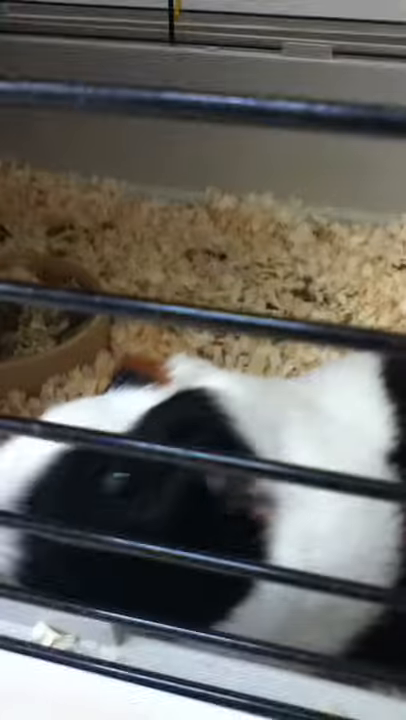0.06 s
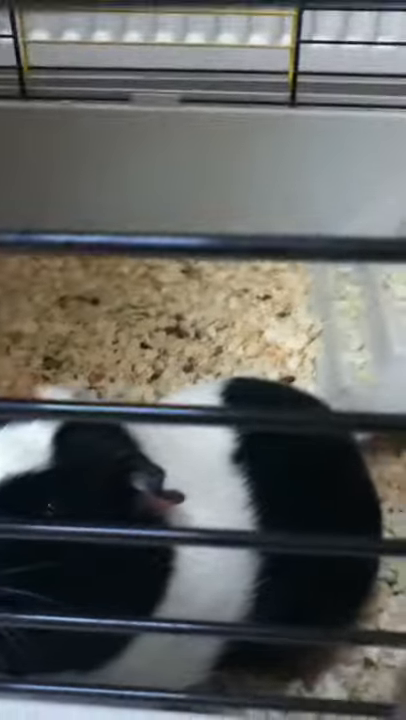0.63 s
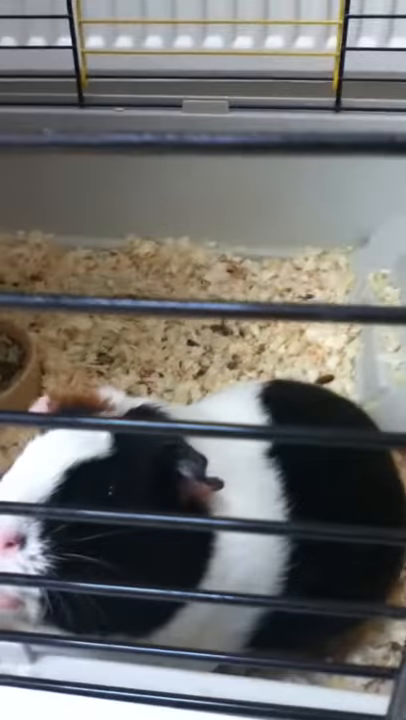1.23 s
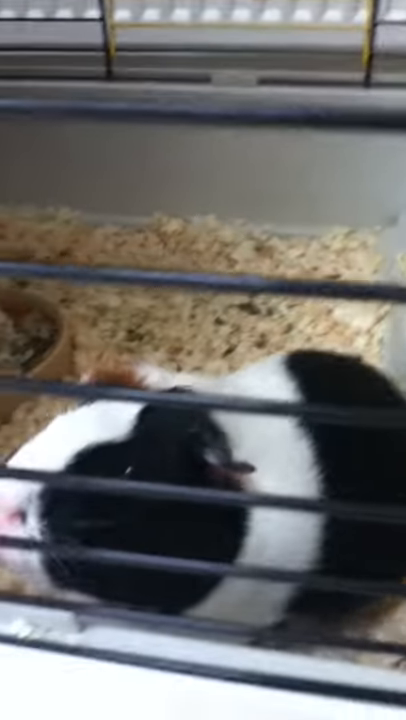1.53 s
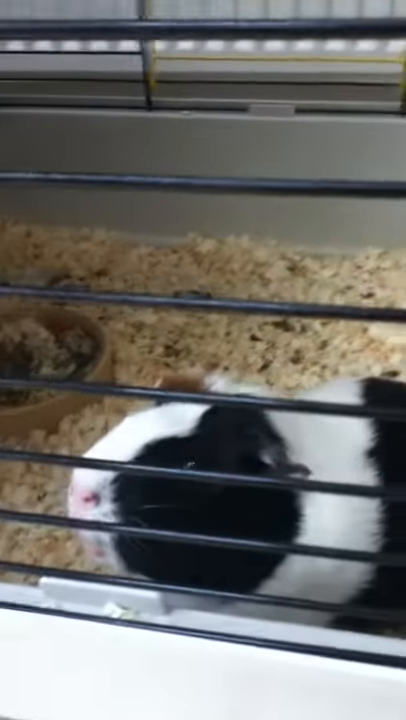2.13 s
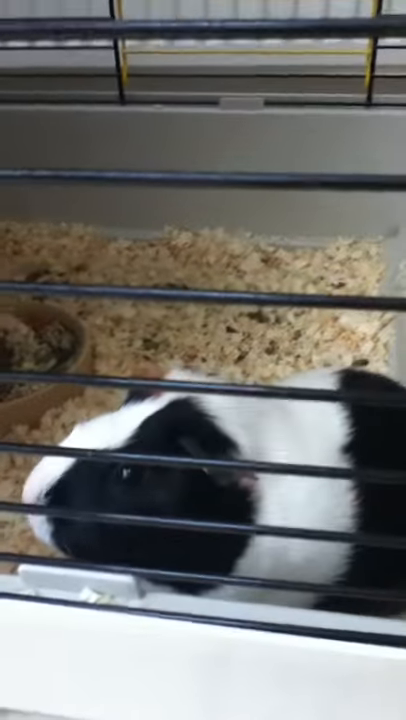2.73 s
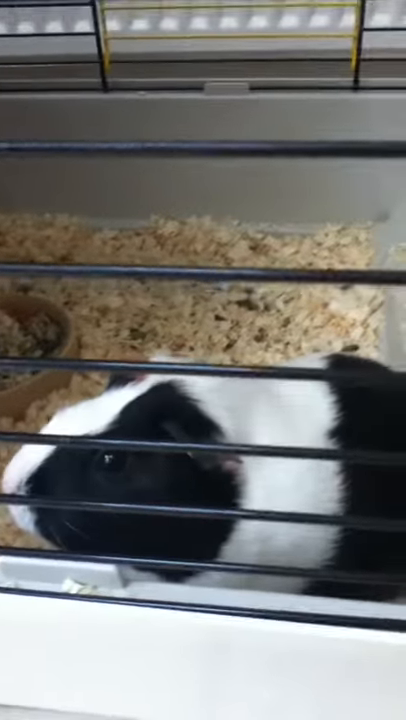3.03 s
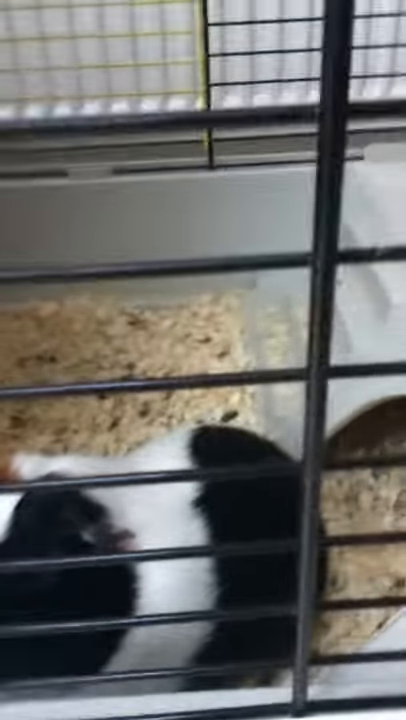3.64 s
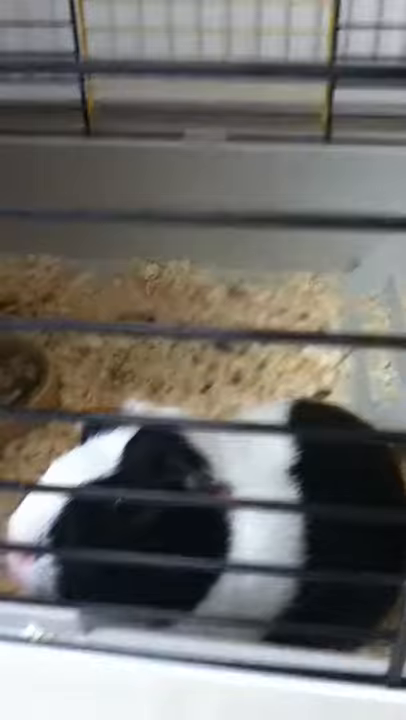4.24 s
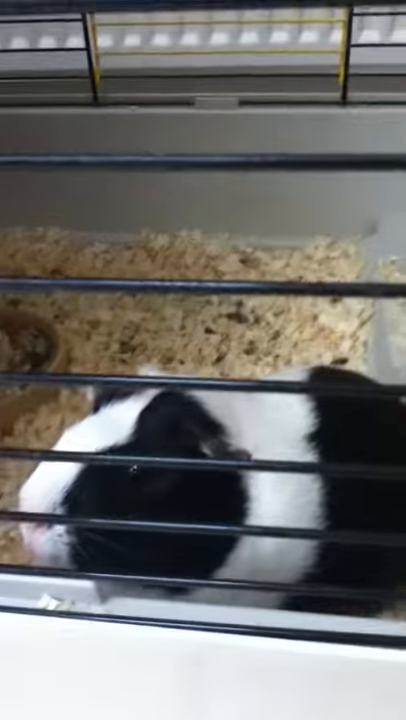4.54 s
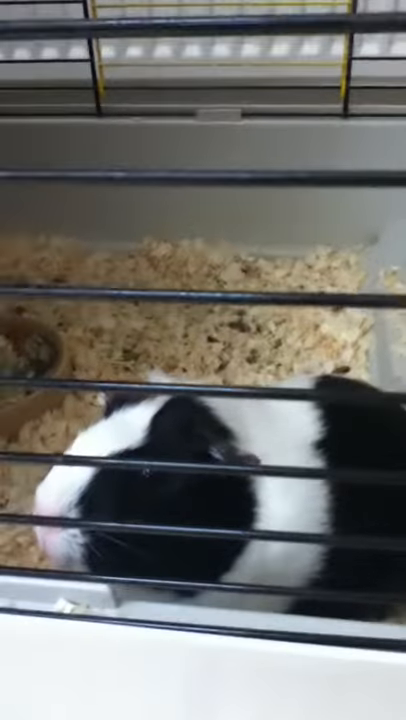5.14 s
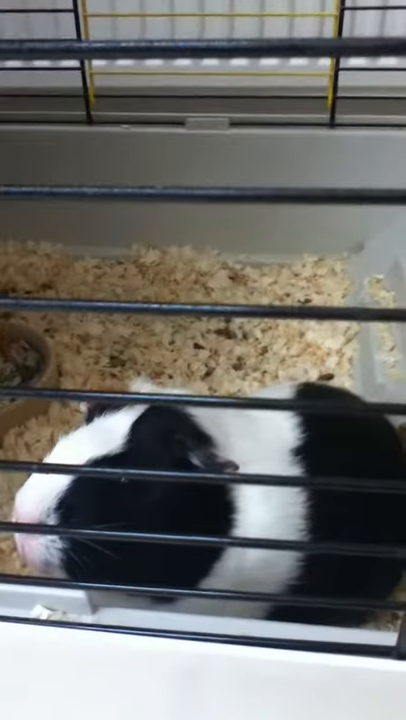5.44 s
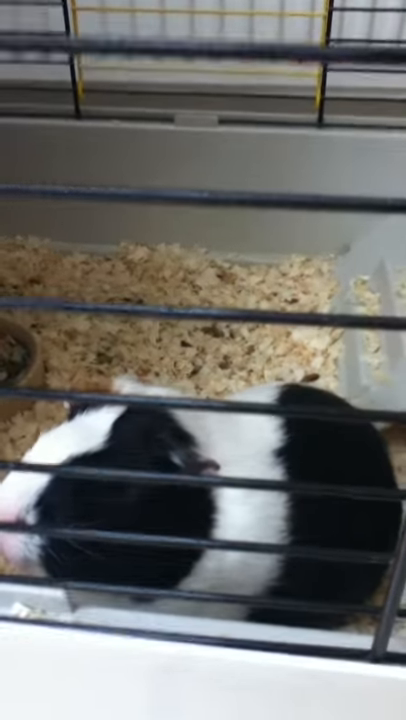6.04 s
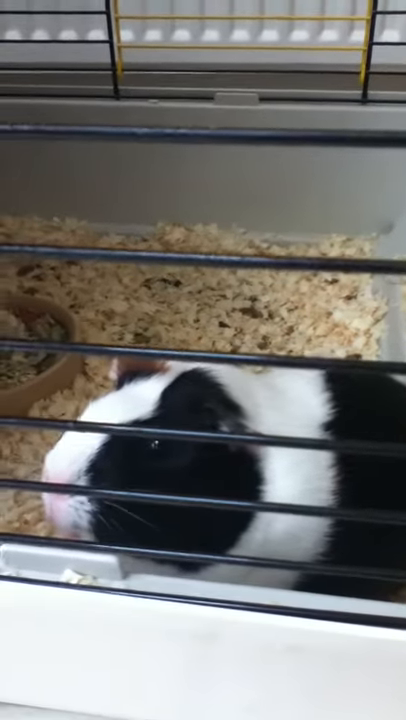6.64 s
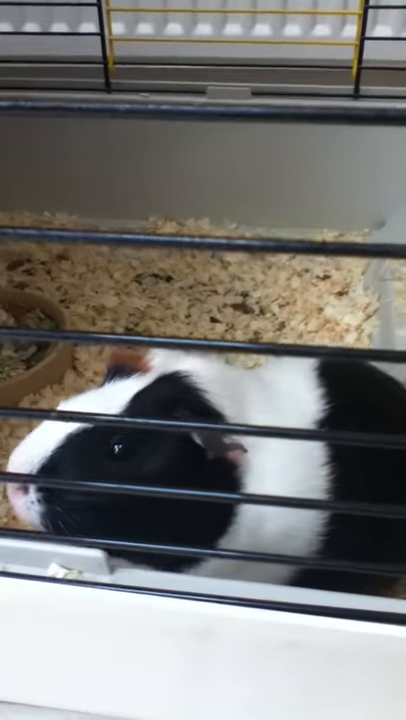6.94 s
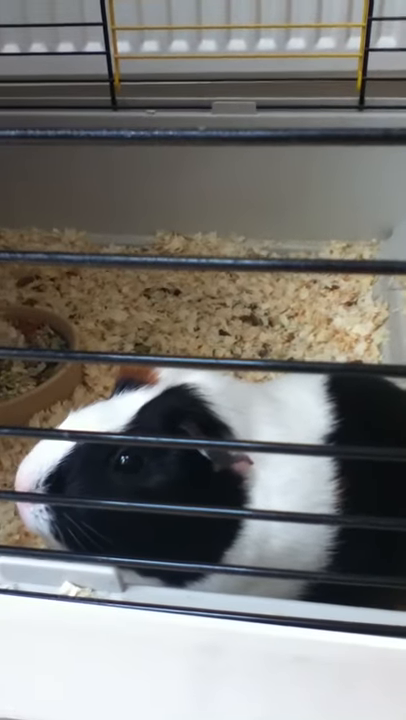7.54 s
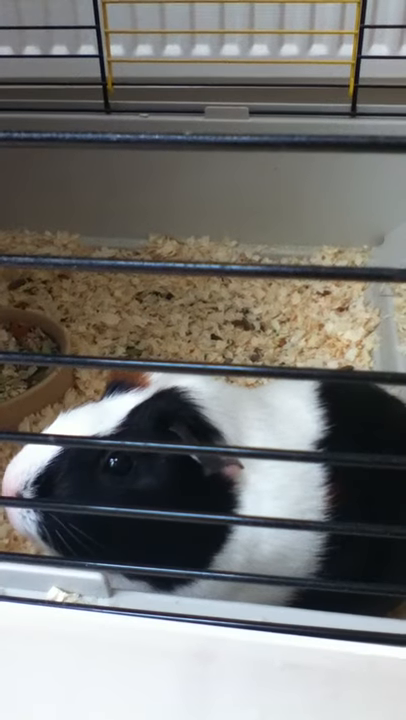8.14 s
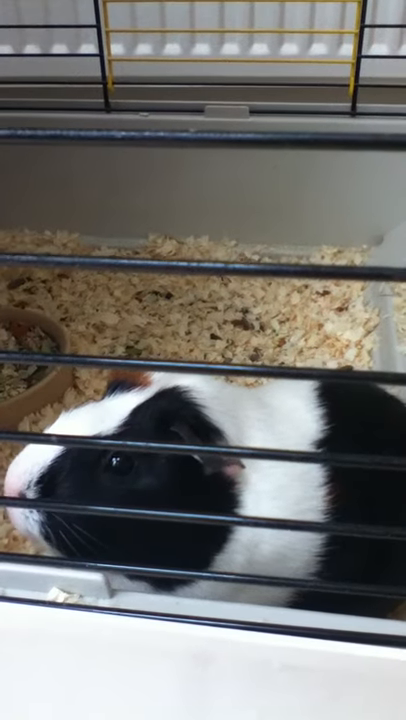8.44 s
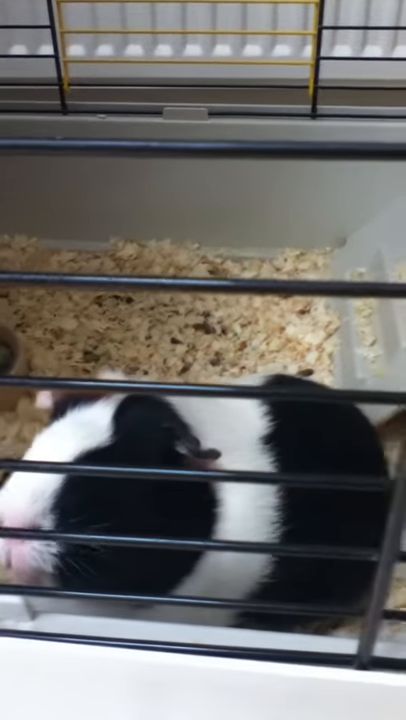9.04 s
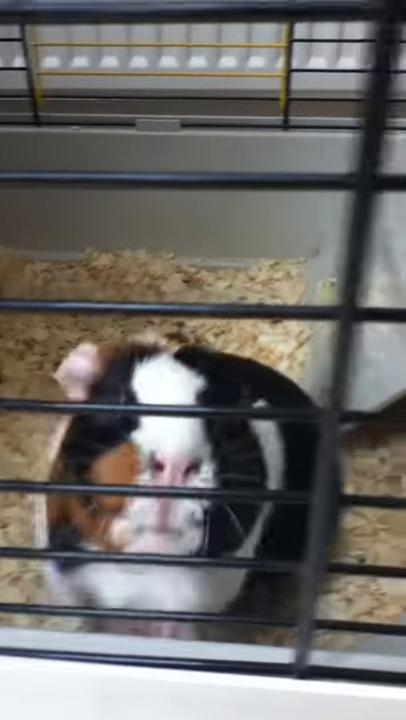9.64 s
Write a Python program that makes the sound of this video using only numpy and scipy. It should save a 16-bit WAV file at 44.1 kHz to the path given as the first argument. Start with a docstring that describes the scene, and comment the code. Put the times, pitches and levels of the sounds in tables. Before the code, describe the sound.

Close, rising guinea pig chirps mix with loud, shrill squeals while feet rustle softly in a wire cage indoors.

```python
"""Guinea pigs beg in a wire cage, close to the microphone in a small room; faint mains hum and whine.
From the start their chirps overlap, each a low hum of the vocal folds that sweeps upward, and three
calls climb to thin squeals. Claws and bars tick; a second in, feet begin to scuffle in wood shavings
on the plastic tray. Chirps fill the middle, with one squeal; from six to nine seconds five more come.
A flurry of scuffles and ticks ends the scene."""
import sys
import numpy as np
from scipy import signal
from scipy.fft import rfft, irfft, next_fast_len
from scipy.io import wavfile
from scipy.ndimage import uniform_filter1d, minimum_filter1d, map_coordinates

SR = 44100
rng = np.random.default_rng(int(sys.argv[2]) if len(sys.argv) > 2 else 0)


def digitize_waveform(pressure):
    """Quantize a signal to 16-bit integers and store it at the path in sys.argv[1].

    Rows of a 2-D input are taken as channels; values are limited to [-1, 1].
    """
    field = np.atleast_2d(pressure).T
    bounded = np.clip(field, -1, 1)
    quanta = np.round(bounded * 32767).astype(np.int16)
    wavfile.write(sys.argv[1], SR, quanta)


N = 435708
TOP_HZ = 15750  # upper edge of the band

# Room tone. Each row: frequency in Hz, relative level in dB.
AIR_COLOUR = [(25, -16.5), (70, -3.5), (300, -1), (1000, -13.5), (2500, -12.5), (4000, -17), (13000, -22)]
# Mains hum and a thin whine. Each row: frequency in Hz, base level in dB.
MAINS_TONES = [(120, -66), (14994, -78)]
# Rise and fall of room tone and mains together. Each row: time in seconds, gain in dB.
BACKGROUND_GAIN = [(.55, 4), (.62, 4.5), (1.0, -3), (2.2, 1), (6.15, 4.5), (6.3, -7.5), (8.3, -2.5),
                   (9.88, 4)]

# Begging chirps. Each row: start, hum length and sweep length in seconds; hum pitch, final pitch and
# arch of the sweep in Hz; base level and swell over the sweep in dB.
CHIRP_CALLS = [(0, 0.023, 0.09, 553, 1825, -160, -33.5, 0.5),
               (0.239, 0.067, 0.038, 556, 1430, -73, -31, -6),
               (0.364, 0.049, 0.16, 609.4, 2022, 365.5, -32.5, 3),
               (0.504, 0.059, 0.041, 591, 1875, -425, -32, 0.5),
               (0.769, 0.053, 0.01, 586, 800, 8, -35, -21.5),
               (.99, 0.048, 0.048, 635.5, 1580, 37.5, -35.5, 3),
               (1.02, 0.047, 0.036, 594, 1384, -135, -37, 5.5),
               (1.257, 0.072, 0.22, 566, 2106, -140, -41, 0.5),
               (1.514, 0.065, .12, 630, 2330, 426.5, -38, -1),
               (1.662, 0.067, 0.15, 543, 1818, 183.5, -40, 4),
               (1.813, 0.069, .18, 560, 2305, 318, -44.5, 11.5),
               (2.01, 0.051, 0.018, 602, 810, 4, -39.5, -2.5),
               (2.231, 0.061, 0.15, 565, 1953, 402, -40, -1.5),
               (2.257, 0.08, 0.05, 555, 2665, 428, -39, -9.5),
               (2.53, .086, .13, 576, 2208, 343, -36.5, -5.5),
               (2.826, 0.072, 0.055, 570, 2117, -120, -38.5, 7.5),
               (2.875, 0.067, 0.13, 520, 2365, 93.5, -42, -2),
               (3.095, 0.078, 0.086, 579.6, 1130, 380.5, -37.5, -1),
               (3.202, 0.075, .13, 526.5, 2754, 164.5, -41, 0),
               (3.36, 0.085, 0.094, 554, 1106, 560.5, -38, -1.5),
               (3.527, 0.076, .11, 564, 1995, 373, -40.5, -1),
               (3.681, 0.08, 0.11, 571, 1810, 281, -38, 4.5),
               (3.871, 0.06, 0.1, 582, 1910, 333.5, -39, -0.5),
               (3.989, 0.071, 0.044, 555.5, 2033, -130, -35.5, -1.5),
               (4.164, 0.074, 0.087, 537.4, 1845, 324, -42.5, 6.5),
               (4.263, 0.079, .125, 580, 1631, 165.5, -38, -0.5),
               (4.473, 0.051, 0.063, 548, 2180, -200, -39, 7),
               (4.758, 0.055, .063, 563, 2054, 174, -38, -2),
               (4.925, 0.072, 0.14, 544, 1793, 376.5, -38, -1),
               (5.052, 0.04, 0.038, 581, 1450, 290, -45.5, 6.5),
               (5.292, 0.081, 0.14, 592, 1690, 215, -40.5, 4),
               (5.64, 0.062, 0.054, 573, 1573, 121, -39, 4.5),
               (5.659, 0.064, 0.054, 538.6, 2194, -32, -40, -2),
               (5.9, 0.047, 0.19, 578, 2055, 308.5, -38.5, 1.5),
               (5.929, .055, .087, 591, 2176, 30, -38.5, 1), (6.226, .06, .06, 575, 2046, 100, -42.5, 3),
               (6.527, 0.053, 0.051, 578, 2150, 30, -47.5, 8), (6.792, 0.036, 0.094, 581, 1550, 32, -40, 6),
               (6.844, 0.084, 0.11, 568, 2650, 520.5, -48.5, 10.5),
               (7.273, 0.059, 0.11, 558, 2110, 248, -48, -3),
               (7.629, 0.08, 0.12, 555.5, 2150, 480.5, -50, 9),
               (7.671, 0.067, 0.22, 574.4, 1778, 220.5, -43, 11),
               (8.004, 0.067, 0.08, 547, 2140, 12.5, -43, -0.5),
               (8.316, 0.063, .13, 552, 2220, 371, -47, 0.5),
               (8.393, 0.1, 0.14, 569, 1564, 148.5, -43.5, 0),
               (8.645, 0.057, 0.12, 569, 2300, 120, -42.5, 4),
               (8.756, 0.087, 0.17, 559, 1678, 77.5, -41, 0), (9.106, 0.069, 0.13, 572, 2430, 331, -36, -2),
               (9.113, 0.079, 0.19, 585.7, 1593, -27, -39.5, -2),
               (9.438, 0.069, .12, 586, 2773, 142.5, -40.5, 17),
               (9.473, 0.093, 0.16, 576, 1820, -290, -35, -6.5),
               (9.749, 0.063, 0.058, 612, 2250, -150, -30, 1.5)]
# Throat colour of a chirp. Each row: frequency in Hz, gain in dB.
THROAT_COLOUR = [(560, 3.5), (1150, 6), (1700, -5), (2300, 4), (2900, -0.5), (3400, -7.5), (4000, -18.5),
                 (5200, -17), (8500, -17.5), (12000, -35.5), (16000, -47.5)]
# How well a chirp carries. Each row: pitch in Hz, gain in dB.
CHIRP_CARRY = [(560, -1.5), (800, 4), (1200, 5), (1450, 5), (1700, -1), (2100, 6.5), (2700, 4.5)]
# Hoarseness in mid-sweep. Each row: pitch in Hz, hiss against the tone in dB for a 0.11 s sweep.
CHIRP_RASP = [(600, -23), (1050, -16), (1350, -14), (1650, -10.5), (1900, -17), (2200, -28)]
KNEE_HZ, HUM_SAG, HUM_LIFT = 742, .06, .07  # where the sweep begins; shares of the hum pitch
ONSET_DB, ONSET_S = -4, 0.0083  # soft entry
QUAVER_HZ, QUAVER_SHARE, QUAVER_DB = 26, .065, 2.2  # rate; greatest depth in pitch and in level
BREAK_DB = 4.5  # about how far the tone gives way at the peak of the rasp

# Squeals. Each row: start, end and scoop length in seconds; entry, settled and final pitch and closing
# flick in Hz; base level, swell, second harmonic, third harmonic, top overtones and brightening in dB.
SQUEAL_CALLS = [(0, 0.192, .11, 1894, 2023, 2430, 3.5, -15.5, -15.5, -34, -42, -13.5, -24),
                (0.58, 0.83, 0.007, 2100, 2286, 2471, 0, -9.5, -3.5, -10, -36.5, -8, 4),
                (1.078, 1.377, 0.23, 1578, 2197, 2337, 2.5, -8.5, -7, -4.5, -23, 5.5, -2),
                (4.457, 4.687, .17, 1507, 2145, 2063, 7, -12.5, -12, -29.5, -51, -23, -34),
                (6.191, 6.306, .085, 2096, 2301, 2088, 5.5, -9, 3, -12.5, -30, -24.5, 5.5),
                (6.313, 6.596, 0.16, 2252, 2442, 2510, -13, -11.5, 1.5, -11.5, -16, -6, -12.5),
                (6.908, 7.5, 0.23, 1434, 2187, 2393, 153, -6, 0, -14.5, -20, -1.5, -22),
                (8.049, 8.234, 0.031, 2200, 2402, 2529, 6.5, -9, 0.5, -13, -25, -14, 16),
                (8.811, 8.957, 0.029, 2180, 2414, 2591, -4.5, -14, 14.5, -13, -29, -6.5, 0)]
# A squeal blooms as it climbs. Each row: pitch in Hz, gain in dB.
SQUEAL_BLOOM = [(1650, -26.5), (1950, -29.5), (2080, -18), (2170, -9.5), (2250, -2.5), (2350, 1),
                (2600, 0.5)]
# Colour of a squeal's top overtones. Each row: frequency in Hz, gain in dB.
SHRILL_COLOUR = [(2400, -1.5), (3400, 6), (4500, -31), (6800, -27), (8800, -31.5), (9500, -38),
                 (10100, -42.5), (11200, -48.5), (12300, -52), (13800, -52.5), (15500, -68)]
OPEN_HZ = 2150  # below this pitch the top overtones keep one dull colour
OVERTONE_BLOOM = 0.81  # share of the bloom that the overtones follow
ENTRY_DB, ENTRY_SHARE = -12, .25  # the overtones fade in over this share of the scoop
FLICK_LEAD_S, FLICK_WIDTH_S, FLICK_DB_PER_HZ = .02, .018, -.055  # an upward flick thins the tone
RELEASE_S, RELEASE_DB = .015, -5  # a squeal sinks just before it stops

# Ticks of claws and bars. Each row: start in seconds, relative level in dB.
CAGE_TICKS = [(0.203, -42), (.3344, -35.5), (.573, -26), (.836, -33.5), (4.0257, -39.5), (4.6718, -40.5),
              (4.7534, -36), (9.612, -27), (9.647, -27), (9.656, -24.5), (9.669, -28), (9.739, -27),
              (9.7653, -28.5)]
# Colour of a tick. Each row: frequency in Hz, relative level in dB.
TICK_COLOUR = [(300, -10.5), (3000, 7), (6000, -2.5), (10000, 1), (12500, -8.5), (16000, -6.5)]

# Scuffling feet. Each row: start and length in seconds, tray thud and shavings level in dB.
FOOT_SCUFFLES = [(1.142, 0.064, -40, -39), (1.893, .035, -50, -70), (2.228, 0.063, -54.5, -72),
                 (2.899, 0.059, -46, -68), (3.42, 0.033, -45, -70), (4.169, 0.079, -41.5, -65),
                 (4.968, 0.26, -47.5, -71.5), (5.585, .09, -36.5, -44.5), (6.178, 0.1, -41.5, -47),
                 (6.693, 0.061, -36, -53), (7.37, .16, -52, -53.5), (7.672, 0.17, -69, -44),
                 (7.92, .11, -47.5, -42), (8.746, 0.068, -42.5, -46), (9.053, 0.03, -39, -53),
                 (9.608, 0.072, -38, -38.5), (9.691, .045, -33.5, -58), (9.742, 0.058, -60, -44.5),
                 (9.847, .098, -44, -33.5)]
# Dull drumming of the plastic tray. Each row: frequency in Hz, relative level in dB.
TRAY_COLOUR = [(40, -42.5), (110, -43.5), (170, -4), (290, -1), (420, -7.5), (800, -12.5), (1500, -27.5),
               (3000, -29.5), (6000, -59)]
# Crackle of wood shavings. Each row: frequency in Hz, relative level in dB.
SHAVINGS_COLOUR = [(200, -21), (1000, 1.5), (3000, 6.5), (5500, -2.5), (9000, -8), (12500, -16.5),
                   (16000, -20)]

# Decay of the small room. Each row: frequency in Hz, time to fall 60 dB in seconds.
ROOM_T60 = [(200, 0.29), (700, 1), (2400, 0.52), (5000, 0.52), (10000, 0.033)]


def amp(db):
    """Decibels to gain."""
    return 10 ** (np.asarray(db) / 20)


def unit(x):
    """Scale to rms 1."""
    return x / np.sqrt(np.mean(x ** 2) + 1e-20)


def along(points, hz):
    """Read (Hz, value) points on a log frequency axis."""
    freqs, values = np.transpose(points)
    return np.interp(np.log(hz + 1), np.log(freqs), values)


def wobble(count, rate):
    """A smooth random curve with rate knots a second."""
    knots = rng.standard_normal(size=2048)
    return map_coordinates(knots, [np.arange(count) * rate / SR], mode="wrap")


def noise(colour):
    """Coloured noise of rms 1, as long as the scene."""
    size = next_fast_len(N)
    gain = amp(along(colour, np.fft.rfftfreq(size, 1 / SR)))
    return unit(irfft(rfft(rng.standard_normal(size)) * gain, size)[:N])


def add(track, start, sound):
    """Mix a sound into the track at start seconds."""
    part = track[max(round(start * SR), 0):][:len(sound)]
    part += sound[:len(part)]


def span(start, end, fade):
    """Sample times of a call and its gate with soft edges."""
    t = np.arange(round(start * SR), round(end * SR)) / SR
    ramp = np.clip(np.minimum(t - start, end - t) / fade, 0, 1)
    return t, np.sin(np.pi / 2 * ramp) ** 2


def background(air_db=-58):
    """Room tone and electrical hum behind the cage, faintest around the late squeals."""
    t = np.arange(N) / SR
    mains = sum(np.sqrt(2) * amp(db) * np.sin(2 * np.pi * hz * t) for hz, db in MAINS_TONES)
    gain = amp(np.interp(t, *np.transpose(BACKGROUND_GAIN)))
    return (amp(air_db) * noise(AIR_COLOUR) + mains) * gain


def voice(pitch, harmonics_db, jitter, shimmer_db):
    """Vocal folds whose rate and strength flutter; one row of levels for each harmonic."""
    order = np.arange(1, len(harmonics_db) + 1)[:, None]
    phase = 2 * np.pi * np.cumsum(pitch * (1 + jitter * wobble(len(pitch), 600))) / SR
    partials = amp(harmonics_db) * np.sin(order * phase) * (order * pitch < TOP_HZ)
    return np.sqrt(2) * partials.sum(axis=0) * amp(shimmer_db * wobble(len(pitch), 300))


def chirp_pitch(t, hold, progress, hum, final, arch):
    """The hum starts sharp, settles and lifts to the knee; an arched sweep leads to the final pitch."""
    hum_points = [(1 + HUM_SAG) * hum, hum, hum, (1 + HUM_LIFT) * hum, KNEE_HZ]
    low = np.interp(t / hold, [0, .25, .5, .75, 1], hum_points)
    sweep = (final - KNEE_HZ) * progress + 4 * arch * progress * (1 - progress)
    return uniform_filter1d(low + sweep, size=400)


def chirps(slope_db=8, uneven_db=1.86, hollow_db=3.0):
    """Each chirp swells into a hum, then sweeps up, quavering and raspy; loudness follows pitch."""
    tones, hiss_envelope = np.zeros(N), np.zeros(N)
    order = np.arange(1, 9)[:, None]
    for start, hold, rise, hum, final, arch, db, swell_db in CHIRP_CALLS:
        t, gate = span(start - .003, start + hold + rise + .002, fade=.005)
        t = t - start
        progress = np.clip((t - hold) / rise, 0, 1)
        pitch = chirp_pitch(t, hold, progress, hum, final, arch)
        level = db + swell_db * progress + along(CHIRP_CARRY, pitch)
        level += ONSET_DB * np.clip(1 - t / ONSET_S, 0, 1)
        # Quick sweeps break up into hiss; slow whimpers stay clear and keep their overtones.
        haste = np.minimum((.11 / rise) ** 1.4, 1.2)
        roughness = haste * amp(along(CHIRP_RASP, pitch))
        # Past the knee the larynx trembles, shaking both pitch and loudness.
        cycles = np.cumsum(QUAVER_HZ * (1 + .25 * wobble(len(t), 30))) / SR
        quaver = np.interp(progress, [0, .25, .5, 1], [0, 1, .8, .2]) * np.sin(2 * np.pi * cycles)
        pitch *= 1 + QUAVER_SHARE * quaver
        level += QUAVER_DB * quaver + uneven_db * wobble(len(t), 50)
        tone_db = level - BREAK_DB * (roughness / amp(max(rasp for _, rasp in CHIRP_RASP))) ** 2
        colour = along(THROAT_COLOUR, order * pitch) - along(THROAT_COLOUR, pitch)
        colour -= slope_db * np.log2(order) * np.sqrt(haste * pitch / 1000)
        colour += hollow_db * (order > 1) * np.array([wobble(len(t), 25) for _ in order])
        call = voice(pitch, tone_db + colour, jitter=.11 * roughness, shimmer_db=9 * roughness)
        add(tones, start + t[0], gate * call)
        add(hiss_envelope, start + t[0], gate * amp(level) * roughness)
    return tones + hiss_envelope * noise([(250, -5.0)] + THROAT_COLOUR)


def squeal_pitch(t, length, scoop, entry, settled, final):
    """A squeal scoops up to its settled pitch, then glides to the final one."""
    below = (entry - settled) * np.clip(1 - t / scoop, 0, 1) ** 1.5
    return below + np.interp(t, [scoop, length], [settled, final])


def squeals(flutter_db=2.5, shrill_db=6):
    """Squeals bloom as they climb; the louder they get, the steadier and purer the tone."""
    out = np.zeros(N)
    top_orders = np.arange(4, 8)[:, None]
    for (start, end, scoop, entry, settled, final, flick_hz,
         db, swell_db, second_db, third_db, top_db, brighten_db) in SQUEAL_CALLS:
        length = end - start
        t, gate = span(start - .002, end + .004, fade=.009)
        flick = flick_hz * np.exp(-((t - end + FLICK_LEAD_S) / FLICK_WIDTH_S) ** 2)
        pitch = squeal_pitch(t - start, length, scoop, entry, settled, final) + flick
        from_middle = (t - start) / length - .5
        effort = db + swell_db * from_middle + FLICK_DB_PER_HZ * flick
        effort += RELEASE_DB * np.clip(1 + (t - end) / RELEASE_S, 0, 1)
        bloom = along(SQUEAL_BLOOM, pitch)
        level = effort + bloom
        top = top_db + shrill_db + along(SHRILL_COLOUR, top_orders * np.maximum(pitch, OPEN_HZ))
        colour = np.vstack([np.full(len(t), second_db), np.full(len(t), third_db), top])
        flutter = flutter_db * np.array([wobble(len(t), 45) for _ in colour])
        overtones = effort + OVERTONE_BLOOM * bloom + brighten_db * from_middle + colour + flutter
        overtones += ENTRY_DB * np.clip(1 - (t - start) / (ENTRY_SHARE * scoop), 0, 1)
        slack = np.clip(-level / 30, 0, 1) ** 2  # 0 at full voice, 1 when quiet
        pitch *= 1 + (.0012 + .011 * slack) * wobble(len(t), 70)
        call = voice(pitch, np.vstack([level, overtones]), jitter=.007 * slack, shimmer_db=.8 * slack)
        add(out, start, gate * call)
    return out


def ticks(t60=0.058, gain_db=-6):
    """Claws and bars make small, bright contacts, each a fast-dying burst of noise."""
    envelope = np.zeros(N)
    t = np.arange(SR // 10) / SR
    for start, db in CAGE_TICKS:
        add(envelope, start, amp(db + gain_db - 60 * t / t60))
    return envelope * noise(TICK_COLOUR)


def scuffles(t60=0.31, grain_db=-2.0, thud_attack_s=0.001, crackle_attack_s=0.0063):
    """Each shuffle of feet drums the tray and stirs up a crackle in the shavings."""
    thud, crackle = np.zeros(N), np.zeros(N)
    t = np.arange(SR // 2) / SR
    for start, length, thud_db, shavings_db in FOOT_SCUFFLES:
        fall = amp(-5 * np.minimum(t / length, 1) - 60 * np.maximum(t - length, 0) / t60)
        add(thud, start, amp(thud_db) * fall * (1 - np.exp(-t / thud_attack_s)))
        add(crackle, start, amp(shavings_db) * fall * (1 - np.exp(-t / crackle_attack_s)))
    tray = noise(TRAY_COLOUR)
    shavings = unit(noise(SHAVINGS_COLOUR) * amp(grain_db * wobble(N, 580)))
    return thud * tray + crackle * shavings


def room(direct, cage_db=-19, cage_t60=0.15, tail_db=-22):
    """Close up, direct sound leads; quick cage reflections and the room's weak tail follow."""
    hz, t, spectra = signal.stft(rng.standard_normal(SR * 3 // 4), SR, nperseg=256)
    decay = amp(-60 * t / along(ROOM_T60, hz)[:, None])
    tail = signal.istft(spectra * decay, SR, nperseg=256)[1]
    early = rng.standard_normal(len(tail)) * amp(-60 * np.arange(len(tail)) / SR / cage_t60)
    echo = amp(tail_db) * tail / np.linalg.norm(tail) + amp(cage_db) * early / np.linalg.norm(early)
    return direct + signal.fftconvolve(direct, echo)[:N]


def scene():
    """The animals, their cage and the room at one close microphone."""
    cage = chirps() + squeals() + scuffles() + ticks()
    return (room(cage) + background())[None]


def record(dry, ceiling=.71):
    """Behind the microphone a limiter holds the squeals down; the band ends steeply."""
    needed_gain = np.minimum(1, ceiling / (np.abs(dry) + 1e-9))
    limited = dry * uniform_filter1d(minimum_filter1d(needed_gain, size=400), size=300)
    size = next_fast_len(N + SR // 2)
    in_band = np.fft.rfftfreq(size, 1 / SR) < TOP_HZ
    return irfft(rfft(limited, size) * in_band, size)[..., :N]


dry = scene()
out = record(dry)
digitize_waveform(out)
```